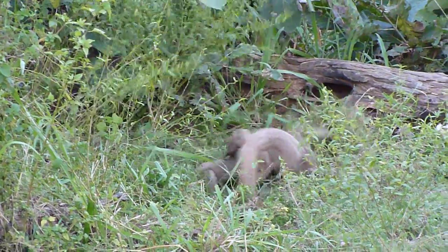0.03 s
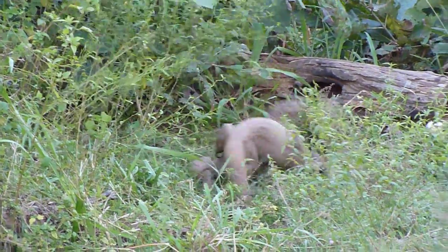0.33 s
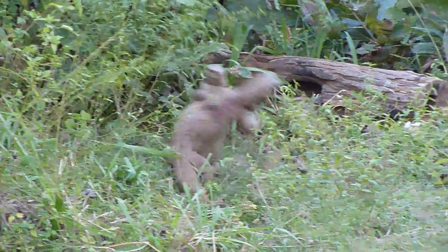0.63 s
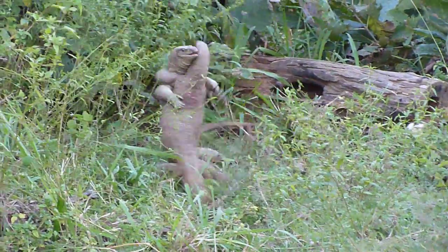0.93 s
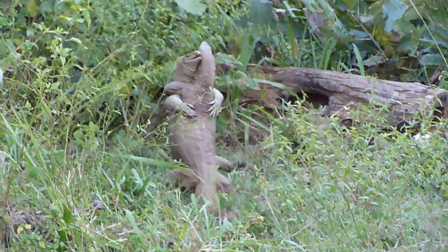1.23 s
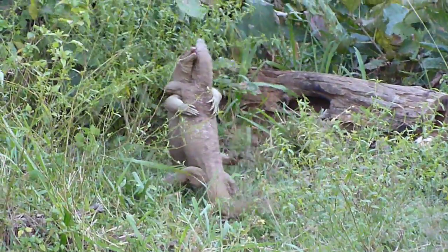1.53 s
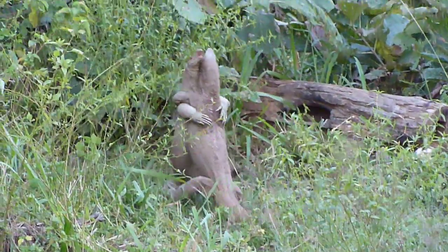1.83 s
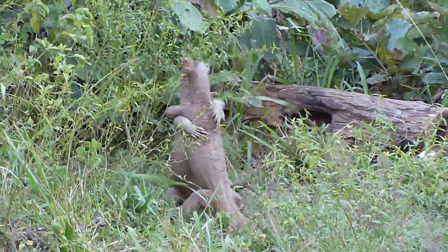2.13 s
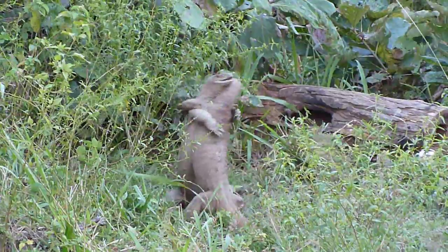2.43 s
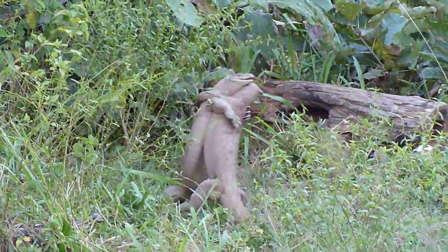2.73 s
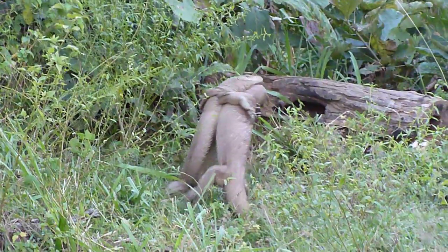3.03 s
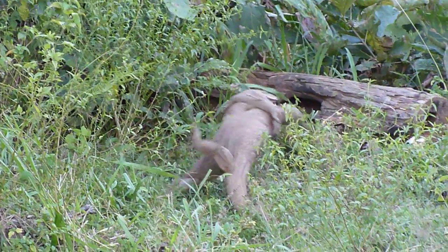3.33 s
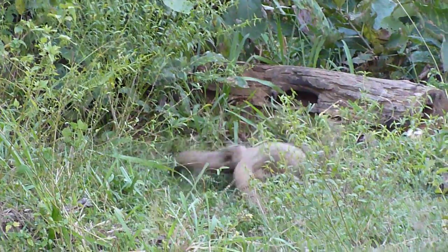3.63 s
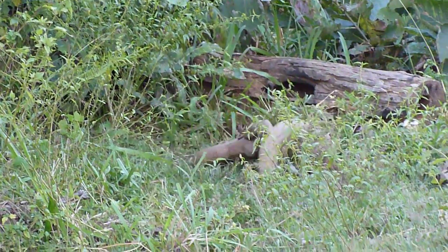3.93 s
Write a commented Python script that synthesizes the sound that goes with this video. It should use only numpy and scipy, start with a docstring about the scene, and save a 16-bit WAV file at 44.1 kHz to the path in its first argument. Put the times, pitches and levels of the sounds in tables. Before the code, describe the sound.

A small songbird repeats a quick phrase of high, sweeping chirps ten times, a little over twice a second throughout. Lizards rustle grass and scuff the ground in the first 0.2 seconds, with small stem snaps near 0.4, 0.7, 2.9 and 3.7 seconds. Farther birds whistle around 1 and 3.3 seconds and call hoarsely near 1.7 and 2.5. A steady distant rush and leaf hiss continue underneath.

```python
"""Outdoors among shrubs, a small songbird repeats one quick phrase a little over twice a second.
Each syllable is a pure tone swept in frequency. Other birds whistle farther off, and all the calls
reflect from ground and foliage. Under a moving lizard, stems snap as damped oscillators and grass
rustles in many small impulses. Behind lie a steady rush of distant noise, leaf hiss and a faint hum."""
import sys
import numpy as np
from scipy import signal
from scipy.fft import rfft, irfft
from scipy.io import wavfile

SR = 44100
rng = np.random.default_rng(int(sys.argv[2]) if len(sys.argv) > 2 else 0)


def log_audio(samples):
    """Write samples as a 16-bit WAV file to the path given in sys.argv[1]."""
    # one column per channel
    frames = np.atleast_2d(samples).T
    # limit to full scale, then quantise
    limited = np.clip(frames, -1, 1)
    pcm = np.round(limited * 32767).astype(np.int16)
    wavfile.write(sys.argv[1], SR, pcm)


N = 176400
T = np.arange(N) / SR

# The songbird's four syllables: time_from_beat_s, pitch_hz, level_db
DOWNSWEEP_CURVE = [(-.121, 6550, -68.5), (-.112, 6100, -45), (-.104, 4290, -39), (-.099, 3420, -38),
                   (-.094, 2950, -45), (-.090, 2740, -49)]
ARCH_CURVE = [(-.066, 2750, -55), (-.059, 3100, -46), (-.055, 3330, -39.5), (-.051, 3520, -42),
              (-.047, 3780, -50), (-.039, 4350, -55), (-.032, 5400, -57), (-.028, 6080, -49),
              (-.021, 6600, -48.5), (-.019, 6400, -55), (-.014, 4900, -43), (-.010, 3500, -56)]
PIP_CURVE = [(-.0005, 2750, -51), (.002, 3130, -41.5), (.004, 3320, -37), (.007, 3450, -38),
             (.0105, 3520, -51)]
SLUR_CURVE = [(.017, 5200, -51), (.020, 4550, -44), (.0225, 4230, -37), (.026, 3960, -44),
              (.031, 3500, -34.5), (.037, 3080, -38.5), (.041, 2800, -46), (.052, 2300, -49),
              (.056, 2170, -56)]
# Soft notes that open a phrase: start_from_beat_s, length_s, first_hz, last_hz, level_db
LEAD_IN_NOTES = [(-.199, .014, 6000, 6250, -60), (-.168, .011, 5500, 3900, -54.5),
                 (-.138, .012, 3000, 4200, -54)]
# Phrases: beat_s, downsweep_early_s, downsweep_gain_db, arch_gain_db, pip_gain_db, slur_gain_db
SONG_PHRASES = [(.205, 0.0021, -4.5, 3, 2.5, 4.5), (.622, 0.0004, 1.5, 3.5, 3.5, 2),
                (1.0368, 0.00075, -1, -0.5, -1, -0.5), (1.4586, 0.0029, -4.5, -3, -3.5, -1.5),
                (1.880, 0.0023, -4, -1, -3.5, -0.5), (2.302, 0, -3, 0, 1, .5),
                (2.730, .0036, -2, 1, .5, 0.5), (3.159, 0.000063, -2.5, -0.5, 3.5, 0.5),
                (3.5999, 0.0043, -1.5, 0, 2.5, -1.5), (4.052, 0.00033, -2.5, 0.5, 0, 0)]
# Distant whistles and hoarse calls, one curve a call: time_s, pitch_hz, level_db
FAR_WHISTLES = [
    [(.49, 2270, -59), (.52, 2310, -55), (.55, 2290, -60)],
    [(.976, 3130, -65), (.997, 2890, -43), (1.036, 2690, -47.5), (1.07, 2590, -56.5), (1.13, 2440, -61.5),
     (1.165, 2300, -52), (1.18, 2270, -57)],
    [(1.18, 3050, -62), (1.208, 2885, -44.5), (1.23, 2790, -49), (1.25, 2330, -57)],
    [(1.205, 3950, -71), (1.232, 3670, -53), (1.25, 3240, -61)],
    [(3.222, 5850, -63), (3.235, 5500, -57.5), (3.255, 4450, -64), (3.261, 3740, -41), (3.273, 2870, -48.5),
     (3.287, 2380, -55), (3.305, 2100, -52)],
    [(3.365, 3550, -56), (3.37, 3380, -49), (3.377, 3200, -57)],
]
HOARSE_CALLS = [
    [(1.59, 2370, -58), (1.63, 2380, -46), (1.69, 2420, -47.5), (1.74, 2420, -49), (1.77, 2410, -52),
     (1.80, 2410, -59)],
    [(2.44, 2350, -63), (2.465, 2400, -51.5), (2.49, 2230, -53.5), (2.525, 2150, -46), (2.54, 2120, -62)],
]
# Snapping stems: start_s, peak_db, ring_hz, t60_s
STEM_SNAPS = [(0.027, -32, 2510, .016), (0.032, -37, 1860, 0.018), (0.048, -33.5, 3000, 0.012),
              (0.4025, -30, 3300, .0025), (.6946, -31, 1840, 0.0099), (.6972, -35, 1750, 0.0079),
              (2.835, -42.5, 2050, .03), (2.872, -41, 1125, .03), (2.91, -50, 1200, .025),
              (3.711, -39.5, 1890, 0.031)]
# Brushes through dry grass: start_s, length_s, level_db
GRASS_STROKES = [(0.023, .039, -42), (.06, 0.06, -52), (0.392, 0.016, -53), (0.422, 0.0088, -43.5),
                 (1.944, .25, -52), (2.129, 0.057, -52)]
# Envelopes of the ground scuff and the leaf hiss: time_s, level_db
SCUFF_ENVELOPE = [(.092, -70), (.107, -38.5), (.135, -38), (.147, -38.5), (.164, -43.5), (.185, -56)]
HISS_ENVELOPE = [(0, 1), (.45, -1.5), (.8, 2.5), (1.35, 1.5), (1.57, 0), (1.72, 1), (2.15, 1.5), (2.35, 0),
                 (2.7, -4.5), (3.35, -4), (3.55, 1), (4, -2.5)]
# Spectra of grass, scuff, distant rush and leaf hiss: frequency_hz, relative_density_db
GRASS_SPECTRUM = [(200, -3), (700, -3), (1400, -7), (2600, -3.5), (4400, -2.5), (5500, -13.5),
                  (7000, -12.5)]
GROUND_SPECTRUM = [(100, -29), (230, -16.5), (350, -3), (430, -4), (520, 1), (620, -3.5), (780, -4.5),
                   (1050, -14.5), (2300, -9), (3200, -19.5), (7000, -33)]
RUSH_SPECTRUM = [(25, -22), (40, -7.5), (55, 1), (70, -2.5), (90, -1.5), (125, 1), (200, -1.5), (320, -2),
                 (500, -4.5), (700, -4.5), (1000, -8.5), (1600, -11.5), (2500, -14), (5000, -20.5)]
HISS_SPECTRUM = [(800, -5.5), (1800, 1.5), (3200, 5), (4300, 4), (5600, -2), (6500, 3.5), (7000, -27.5),
                 (7600, -12.5)]
# Partials of the hum: pitch_hz, level_db
HUM_PARTIALS = [(55, -70.5), (88, -63.5), (220, -72), (519, -74.5)]


def songbird(gain_db=-4, pitch_scatter=0.0059, roughness=0.28):
    """Swept tones form each phrase; random frequency and amplitude modulation make no two alike."""
    out = np.zeros(N)
    bend = 1 + pitch_scatter * drift(65)
    for beat, early, down_db, arch_db, pip_db, slur_db in SONG_PHRASES:
        out += from_db(down_db) * whistle(DOWNSWEEP_CURVE, beat - early, bend)
        for syllable, db in ((ARCH_CURVE, arch_db), (PIP_CURVE, pip_db), (SLUR_CURVE, slur_db)):
            out += from_db(db) * whistle(syllable, beat, bend)
        for start, length, first_hz, last_hz, db in LEAD_IN_NOTES:
            out += whistle([(start, first_hz, db), (start + length, last_hz, db)], beat, bend)
    return from_db(gain_db) * out * (1 + roughness * drift(200))


def whistle(curve, start=0, bend=1, edge_s=.0015):
    """A pure tone whose phase is the time integral of its frequency; bend multiplies that frequency."""
    times, hz, db = np.transpose(curve)
    times = np.sort(times) + start
    on = (T > times[0] - edge_s) & (T < times[-1] + edge_s)
    t, out = T[on], np.zeros(N)
    pitch = (np.interp(T, times, hz) * bend)[on]
    fade = np.clip(np.minimum(t - times[0], times[-1] - t) / edge_s + 1, 0, 1)
    out[on] = from_db(np.interp(t, times, db)) * fade * sine(pitch)
    return out


def far_birds(gain_db=-1, vibrato_hz=30.2, vibrato_depth=0.015, jitters=(.016, .05)):
    """Thin whistles, and calls in which periodic modulation gives a quaver and random jitter hoarseness."""
    bend = 1 + 0.0056 * drift(97)
    whistles = sum(whistle(call, bend=bend) for call in FAR_WHISTLES)
    whistles *= 1 + .25 * drift(90)
    shake = drift(200)
    vibrato = 1 + vibrato_depth * np.sin(2 * np.pi * vibrato_hz * T)
    hoarse = sum(whistle(call, bend=vibrato + jitter * shake)
                 for call, jitter in zip(HOARSE_CALLS, jitters))
    hoarse *= rms_one(1 + .45 * drift(120))
    return from_db(gain_db) * (whistles + hoarse)


def stems():
    """Each snap excites a damped oscillator, whose free vibration decays exponentially."""
    out = np.zeros(N)
    for start, db, hz, t60 in STEM_SNAPS:
        age = np.maximum(T - start, 0)
        decay = np.exp(-np.minimum(np.log(1000) * age / t60, 20))
        out += from_db(db) * decay * np.sin(2 * np.pi * hz * age)
    return out


def grass():
    """Brushed dry blades give random impulses, which superpose into a crackling noise."""
    strokes = sum(from_db(db) * gate(start, length, edge_s=0.0056) for start, length, db in GRASS_STROKES)
    return strokes * colour(impulses(per_s=2500, spread_db=-0.5), GRASS_SPECTRUM)


def scuff():
    """Stick-slip friction on the ground: a rapid run of slips merges into one dull scrape."""
    push = from_db(np.interp(T, *np.transpose(SCUFF_ENVELOPE), left=-np.inf, right=-np.inf))
    return push * colour(impulses(per_s=2000, spread_db=1.5), GROUND_SPECTRUM)


def outdoors(direct, ground_delay_s=.0026, leaf_hz=4000):
    """Reflection and scattering: a ground bounce, short wavelengths off near leaves, a tail off trees."""
    ground = from_db(-12) * np.interp(T - ground_delay_s, T, direct)
    highs = signal.sosfilt(signal.butter(3, leaf_hz, "high", fs=SR, output="sos"), direct)
    leaves = from_db(-0.5) * echoes(highs, start_s=.001, t60_s=0.059)
    trees = from_db(-17.5) * echoes(direct, start_s=0.013, t60_s=0.18)
    return direct + ground + leaves + trees


def echoes(x, start_s, t60_s):
    """Diffuse reflections, as convolution with exponentially decaying noise of unit energy."""
    t = T[:SR]
    cloud = rng.standard_normal(SR) * (t > start_s) * np.exp(-np.log(1000) * t / t60_s)
    return signal.fftconvolve(x, cloud / np.linalg.norm(cloud))[:N]


def background(rush_flicker_db=0.82, hiss_flicker_db=2, hum_wander_hz=2.5):
    """Distant rush and leaf hiss have continuous spectra; the hum is a line spectrum that wavers."""
    rush_db = -49.5 + rush_flicker_db * drift(10)
    rush = from_db(rush_db) * colour(rng.standard_normal(N), RUSH_SPECTRUM)
    hiss_db = -56 + np.interp(T, *np.transpose(HISS_ENVELOPE)) + hiss_flicker_db * drift(23)
    hiss = from_db(hiss_db) * colour(rng.standard_normal(N), HISS_SPECTRUM)
    hum = sum(from_db(db) * sine(hz + hum_wander_hz * drift(6.74)) for hz, db in HUM_PARTIALS)
    return rush + hiss + hum


def from_db(db):
    """Decibels to amplitude ratio."""
    return 10 ** (np.asarray(db) / 20)


def rms_one(x):
    """Normalisation to rms 1."""
    return x / np.sqrt(np.mean(x ** 2) + 1e-20)


def sine(hz):
    """A sinusoid of rms 1 that follows an instantaneous frequency."""
    return np.sqrt(2) * np.sin(2 * np.pi * np.cumsum(hz) / SR)


def drift(corner_hz):
    """Low-pass Gaussian noise: a smooth random fluctuation of rms 1."""
    hz = np.arange(N // 2 + 1) * SR / N
    return rms_one(irfft(rfft(rng.standard_normal(N)) / (1 + (hz / corner_hz) ** 2), N))


def colour(x, spectrum):
    """Filtering by multiplication in the frequency domain; rms 1."""
    hz, db = np.transpose(spectrum)
    bin_hz = np.maximum(np.arange(N // 2 + 1) * SR / N, 1)
    gain = from_db(np.interp(np.log(bin_hz), np.log(hz), db))
    return rms_one(irfft(rfft(x) * gain, N))


def gate(start, length, edge_s):
    """An envelope with raised-cosine edges."""
    ramp = np.clip(np.minimum(T - start, start + length - T) / edge_s, 0, 1)
    return np.sin(np.pi / 2 * ramp) ** 2


def impulses(per_s, spread_db):
    """A Poisson train of clicks of random sign and size."""
    clicks = (rng.random(N) < per_s / SR) * rng.choice([-1, 1], N)
    return clicks * from_db(spread_db * np.minimum(rng.exponential(1, N), 3))


def scene():
    """Superposition of birds, lizard and background in one channel."""
    birds = outdoors(songbird() + far_birds())
    lizard = stems() + grass() + scuff()
    return (birds + lizard + background())[None]


def record(dry, stopband_hz=7700):
    """A steep low-pass filter removes the highest treble."""
    return signal.sosfilt(signal.cheby2(14, 55, stopband_hz, fs=SR, output="sos"), dry)


dry = scene()
out = record(dry)
log_audio(out)
```